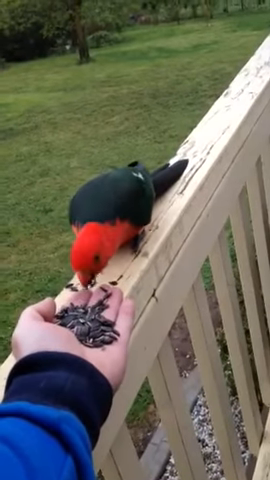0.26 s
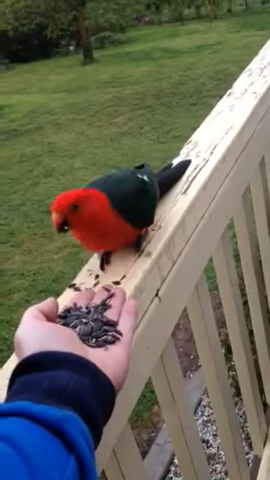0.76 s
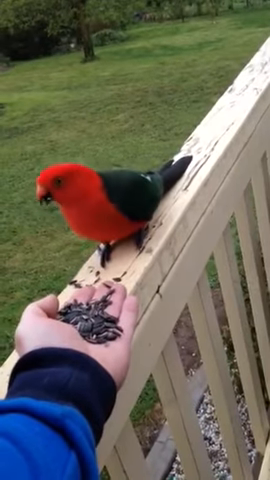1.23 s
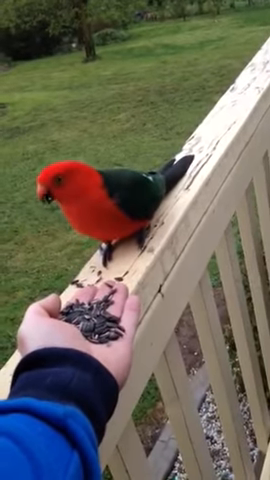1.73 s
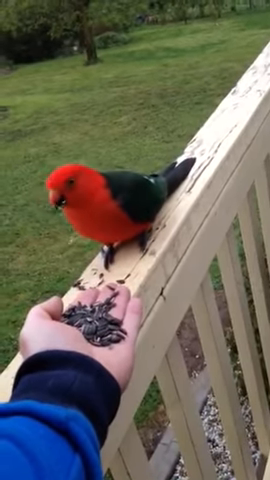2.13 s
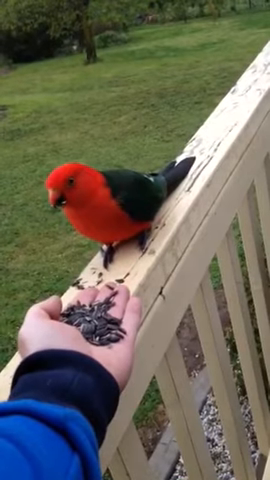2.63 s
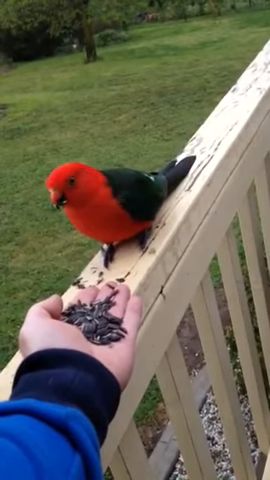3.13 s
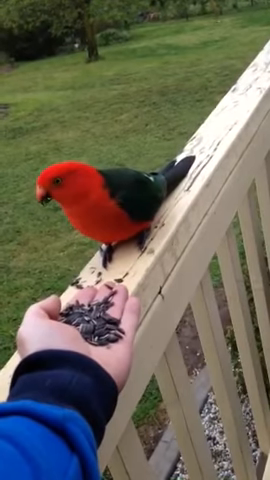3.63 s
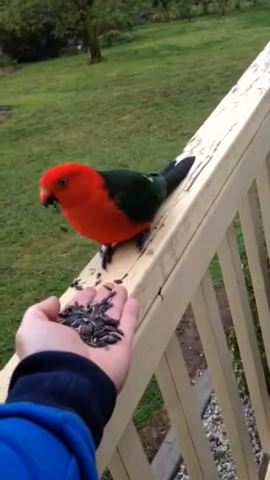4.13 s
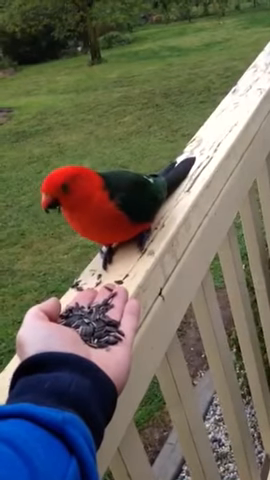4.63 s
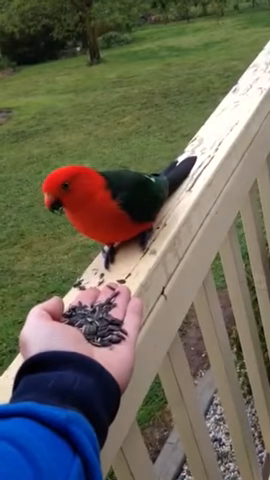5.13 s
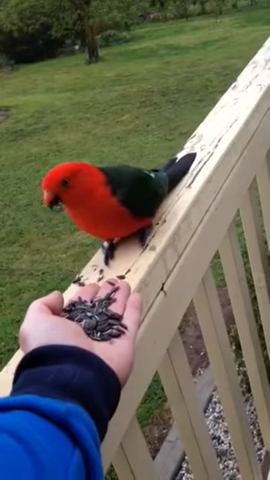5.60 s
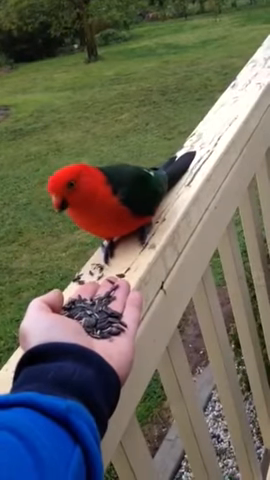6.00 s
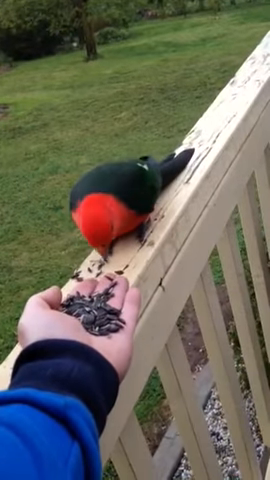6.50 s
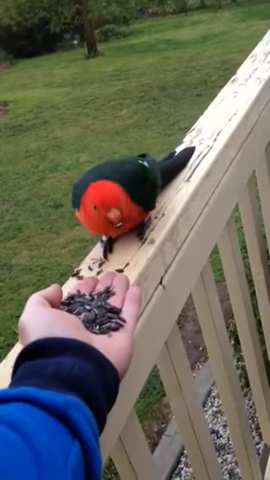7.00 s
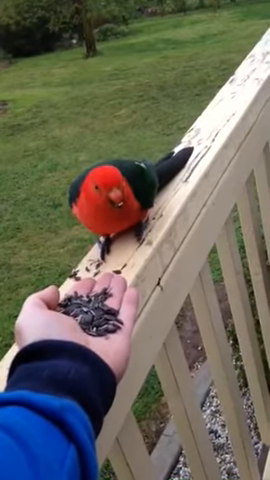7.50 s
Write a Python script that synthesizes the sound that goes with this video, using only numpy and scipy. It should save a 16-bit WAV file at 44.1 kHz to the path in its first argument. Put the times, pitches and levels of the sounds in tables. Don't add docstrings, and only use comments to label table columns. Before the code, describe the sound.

A parrot cracks and husks seeds close by with crisp clicks, wet smacks and nibbles, while garden birds peep and whistle over quiet outdoor air.

```python
import sys
import numpy as np
from scipy import signal
from scipy.fft import rfft, irfft
from scipy.io import wavfile

SR = 44100
rng = np.random.default_rng(int(sys.argv[2]) if len(sys.argv) > 2 else 0)


def gain_from_db(level_db):
    decades = np.asarray(level_db, float) / 20
    return 10 ** decades


def store_pcm(level_fs):
    pcm = np.round(np.clip(level_fs, -1, 1) * 32767).astype(np.int16)
    wavfile.write(sys.argv[1], SR, np.atleast_2d(pcm).T)


N = 341775

# start in seconds, level in dB, level of the rasp above it in dB.
FALLING_CALLS = [(0.313, -71.5, -71), (1.293, -72.5, -67.5), (1.575, -72, -66), (2.478, -71, -68.5),
                 (3.24, -72.5, -67), (4.119, -81, -62), (4.764, -69.5, -59), (5.014, -68, -62),
                 (5.876, -74.5, -70.5), (6.744, -70, -58.5), (6.983, -74.5, -65)]


def resonate(x, hz, width):
    r = np.exp(-np.pi * width / SR)
    feedback = [1, -2 * r * np.cos(2 * np.pi * hz / SR), r * r]
    return signal.lfilter(np.array([1, 0, -1]) * (1 - r * r) / 2, feedback, x + 1e-18)


def body(x, modes):
    return sum((-1) ** k * gain_from_db(db) * resonate(x, hz, width) for k, (hz, width, db) in enumerate(modes))


def rms_one(x):
    return x / np.sqrt(np.mean(x ** 2) + 1e-20)


def drift(rate, count=N):
    r = np.exp(-2 * np.pi * rate / SR)
    settle = 9000
    noise = rng.standard_normal(count + settle)
    return rms_one(signal.lfilter([1], [1, -2 * r, r * r], noise)[settle:])


def band(low_hz, high_hz):
    edges = signal.butter(2, [low_hz, high_hz], "band", fs=SR, output="sos")
    return rms_one(signal.sosfilt(edges, rng.standard_normal(N)))


def span(s, length):
    return np.arange(round(s * SR), min(round((s + length) * SR), N))


def in_time(rows):
    s, *columns = np.transpose(rows)
    at = np.arange(round(s[0] * SR), min(round(s[-1] * SR), N))
    return at, [np.interp(at / SR, s, column) for column in columns]


def swells(table, flat=.6):
    out = np.zeros(N)
    for s, length, db in table:
        at = span(s, length)
        out[at] += gain_from_db(db) * np.abs(np.sin(np.linspace(0, np.pi, len(at)))) ** flat
    return out


def echoes(x, t60, wet_db):
    t = np.arange(SR // 2) / SR
    tail = rng.standard_normal(len(t)) * gain_from_db(-60 * t / t60) * (t > .0012)
    tail /= np.sqrt(np.sum(tail ** 2))
    return x + gain_from_db(wet_db) * signal.fftconvolve(x, tail)[:N]


def notes(table, partials_db, rough, flat, turn=.5):
    out = np.zeros(N)
    for s, length, start_hz, middle_hz, end_hz, db in table:
        at = span(s, length)
        x = np.linspace(0, 1, len(at))
        bent = x ** (np.log(.5) / np.log(turn))
        hz = np.polyval(np.polyfit([0, .5, 1], [start_hz, middle_hz, end_hz], 2), bent)
        phase = 2 * np.pi * np.cumsum(hz * (1 + rough * drift(170, count=len(at)))) / SR
        waver_db = 60 * rough * drift(43, count=len(at))
        swell = np.abs(np.sin(np.pi * bent ** 0.91)) ** flat * gain_from_db(db + 10.0 + waver_db)
        out[at] += swell * sum(gain_from_db(p) * np.sin((k + 1) * phase) for k, p in enumerate(partials_db))
    return out


def garden():
    # frequency in Hz, density in dB per Hz.
    air_colour = [(18, -60.5), (30, -1.5), (98, -1), (245, -13), (540, -19), (780, -16), (1500, -19),
                  (1720, -20), (2170, -23.5), (7470, -48.5), (14400, -41), (16000, -61)]
    # time in seconds, level in dB.
    leaf_levels = [(0.0, -65.5), (1.21, -70), (1.96, -65), (3.43, -65), (4.94, -60.5), (5.72, -62.5),
                   (6.52, -66), (6.97, -62), (7.75, -64)]
    hz, db = np.transpose(air_colour)
    grid = np.fft.rfftfreq(N, 1 / SR) + 1
    colour = gain_from_db(np.interp(np.log(grid), np.log(hz), db))
    air = rms_one(irfft(rfft(rng.standard_normal(N)) * colour, N))
    _, (leaf_db,) = in_time(leaf_levels)
    leaves = sum(gain_from_db(leaf_db - 12.5 + 2.2 * drift(9)) * band(low_hz, low_hz * 1.425)
                 for low_hz in (2345, 3200, 4500, 6200))
    drone = rms_one(resonate(resonate(rng.standard_normal(N), 1700, 150), 1700, 150))
    return gain_from_db(-61.0) * air + leaves + gain_from_db(-72.0) * drone


def mains_hum():
    # frequency in Hz, level in dB.
    harmonics = [(50, -66), (100, -61.5), (150, -71)]
    t = np.arange(N) / SR
    return sum(gain_from_db(db + 1.0 + 0.44 * drift(2.2)) * np.sin(2 * np.pi * hz * t) for hz, db in harmonics)


def far_car():
    # time in seconds, crank rate in Hz, level in dB.
    drive = [
        (0.0, 28, -81),
        (1.5, 32.17, -69.5),
        (3.0, 37.78, -61.5),
        (3.7, 40.35, -74.5),
        (5.7, 39.86, -72.5),
        (6.6, 40, -80),
    ]
    # multiple of the crank rate, level in dB.
    orders = [(2, 5), (3, 4.5), (4, -12)]
    out = np.zeros(N)
    at, (crank_hz, db) = in_time(drive)
    turns = np.cumsum(crank_hz) / SR
    out[at] += sum(gain_from_db(db + rel_db) * np.sin(2 * np.pi * k * turns) for k, rel_db in orders)
    return out


def dove():
    # start in seconds, length in seconds, level in dB.
    coos = [(1.24, 0.046, -65.5), (1.55, 0.36, -65.5), (2.08, 0.42, -66.5), (2.6, 0.29, -65.5),
            (3.16, 0.25, -60.5), (3.43, 0.15, -63), (5.88, 0.32, -68)]
    coo = rms_one(resonate(resonate(rng.standard_normal(N), 776, 70), 776, 70))
    return swells(coos) * coo


def deck_thuds():
    # start in seconds, length in seconds, level in dB.
    thuds = [(0.01, 0.14, -54.5), (.52, 0.083, -64.5), (1.22, 0.16, -57), (1.7, 0.14, -61),
             (2.4, 0.2, -61.5), (3.16, 0.25, -55), (4.62, 0.089, -60.5), (5.24, 0.13, -54),
             (5.68, 0.27, -61.5), (6.85, 0.17, -74)]
    boom = rms_one(resonate(resonate(rng.standard_normal(N), 181.0, 29.4), 157.5, 42))
    return swells(thuds) * (boom + 0.4 * band(162, 390))


def falls():
    # seconds after the start, pitch in Hz, relative level in dB.
    shape = [
        (0, 3550, -10),
        (.02, 3650, -2.5),
        (.05, 3900, 4),
        (.085, 3200, -2),
        (.125, 2450, -9),
    ]
    out = np.zeros(N)
    for s, db, _ in FALLING_CALLS:
        at, (hz, shape_db) = in_time([(s + after_s, hz, rel_db) for after_s, hz, rel_db in shape])
        blur = 1 + .05 * drift(230, count=len(at))
        phase = 2 * np.pi * np.cumsum(hz * blur) / SR
        out[at] += gain_from_db(db + 11 + shape_db + 2.7 * drift(60.9, count=len(at))) * np.sin(phase)
    return out


def rasps():
    # start in seconds, length in seconds, level in dB.
    scolds = [(4.429, 0.078, -54.5), (5.24, .2, -64), (5.42, .28, -66), (6.415, 0.11, -67),
              (6.869, 0.034, -62.5), (6.932, 0.025, -67)]
    above_calls = [(s - .02, .1, rasp_db) for s, db, rasp_db in FALLING_CALLS]
    return swells(above_calls + scolds, flat=1.5) * band(3300, 5460) * gain_from_db(2 * drift(60))


def far_birds():
    # start in seconds, length in seconds, start pitch in Hz, end pitch in Hz, level in dB.
    chirps = [(1.107, 0.1, 5820, 3700, -71.5), (1.201, 0.054, 4900, 3900, -73),
              (1.912, 0.072, 4900, 4600, -67), (1.958, 0.076, 3800, 3630, -64),
              (2.085, 0.145, 3850, 3750, -68.5), (2.16, 0.07, 3300, 3000, -72.5),
              (2.27, 0.082, 3950, 3780, -73), (2.31, 0.13, 3300, 3050, -74.5),
              (2.855, 0.06, 3450, 3900, -79), (3.094, 0.055, 5300, 3900, -65.5),
              (3.128, 0.091, 3200, 2840, -75), (0.76, 0.084, 3300, 3090, -79.5),
              (4.44, 0.022, 4000, 3850, -65), (0.135, 0.009, 5800, 5600, -56),
              (0.157, 0.012, 5800, 5630, -63.5), (7.235, .07, 4600, 3400, -82),
              (1.865, .04, 5400, 5300, -74), (2.12, .07, 4350, 4500, -72), (1.925, .04, 4100, 3900, -72),
              (2.1, 0.043, 3300, 3050, -68), (7.664, 0.042, 4870, 3900, -65),
              (5.68, 0.23, 6950, 6800, -80.5), (5.95, 0.21, 6350, 6500, -82), (3.39, 0.22, 7100, 8500, -85)]
    early_fall = .62
    drops = [(s, length, hz, hz + early_fall * (end_hz - hz), end_hz, db)
             for s, length, hz, end_hz, db in chirps]
    far = falls() + rasps() + notes(drops, [0], rough=.065, flat=.8)
    return echoes(far, t60=.33, wet_db=-4)


def peeps():
    # start in seconds, length in seconds, top of the first partial in Hz,
    # end pitch as a share of the top, level in dB.
    peep_rows = [(2.99, 0.035, 2050, 0.97, -71), (3.525, 0.035, 2170, 0.9, -66),
                 (3.69, 0.039, 1830, 0.76, -56.5), (3.929, 0.065, 2090, 0.9, -65),
                 (4.109, 0.051, 1760, .87, -59.5), (4.213, 0.05, 2050, .89, -66),
                 (4.288, 0.035, 1930, 0.85, -69)]
    partials_db = [-22, -19, -5.5, -15, -26, -29, -40]
    climb_hz_per_s = 8200
    arches = [(s, length, hz - climb_hz_per_s * length, hz, end * hz, db)
              for s, length, hz, end, db in peep_rows]
    return echoes(notes(arches, partials_db, rough=.006, flat=.9), t60=.3, wet_db=-13)


def whistles():
    # start in seconds, length in seconds, pitch in Hz, glide in Hz, level in dB.
    whistle_rows = [(3.806, 0.022, 4440, -80, -65), (4.43, .018, 4900, -130, -57.5),
                    (4.442, .02, 4980, -52, -60), (4.445, .025, 4400, -51, -62),
                    (3.856, 0.028, 5860, -300, -64), (4.731, 0.13, 6020, 3, -67),
                    (4.368, 0.048, 5930, 128, -53.5), (4.56, 0.051, 6050, 203, -62),
                    (4.589, 0.053, 6160, -63, -47), (4.68, 0.049, 6065, -250, -53),
                    (4.85, 0.13, 5124, 39, -51.5), (4.96, 0.12, 5140, -57, -62),
                    (5.09, 0.097, 5100, -100, -54), (5.211, 0.07, 5130, -33, -62),
                    (6.118, .13, 3350, 454, -80.5), (6.576, 0.14, 3455, -73, -77.5),
                    (6.3, 0.078, 3400, 50, -75), (7.29, .1, 3450, -40, -82), (3.54, 0.05, 4900, -100, -77),
                    (7.55, 0.18, 2100, 277, -81), (7.685, 0.073, 3410, 7, -72),
                    (5.227, 0.087, 6370, 54, -75), (5.45, .09, 6250, 148, -72),
                    (6.31, 0.067, 3060, -650, -79), (6.054, .06, 3700, -51, -83)]
    glides = [(s, length, hz, hz + glide_hz / 2, hz + glide_hz, db)
              for s, length, hz, glide_hz, db in whistle_rows]
    return echoes(notes(glides, [0], rough=.004, flat=1.5), t60=.42, wet_db=-6.5)


def hollow_pops():
    # time in seconds, peak in dB.
    pops = [
        (1.206, -47),
        (3.7403, -25.5),
    ]
    tap = np.zeros(N)
    for s, db in pops:
        tap[round(s * SR)] = -gain_from_db(db) * 25
    return body(tap, [(604, 480, 5.1), (995, 190, 4.9)])


def crackle():
    # start in seconds, length in seconds, level in dB.
    rustles = [(.04, 0.067, -73), (.12, 0.084, -70), (.545, 0.033, -65), (.585, 0.089, -71),
               (.725, .05, -72), (.83, .1, -74), (.95, 0.06, -72), (1.04, 0.23, -75), (1.395, 0.031, -73),
               (1.5, .07, -64), (1.58, .2, -78), (1.81, .14, -76), (2.0, 0.43, -86), (2.88, .2, -75),
               (3.2, 0.041, -67), (3.33, 0.28, -74), (4.75, .1, -73), (5.3, .1, -72), (5.43, .1, -72),
               (5.56, .16, -69.5), (6.77, 0.063, -69), (6.835, 0.02, -59), (6.87, 0.19, -74),
               (7.08, 0.21, -69), (7.28, .47, -74)]
    grain_hz, tilt_db = (6900, 14000), -19
    sizes = gain_from_db(3.5 * np.minimum(rng.exponential(1, N), 3.5)) * rng.choice([-1, 1], N)
    born = rng.random(N) < 5000 * gain_from_db(5 * drift(40)) / SR
    dealt = rng.integers(0, 6, N)
    grains = sum(gain_from_db(tilt_db * k / 5) * resonate(sizes * born * (dealt == k), hz, 0.26 * hz)
                 for k, hz in enumerate(np.geomspace(*grain_hz, num=6)))
    return (gain_from_db(-83.0) + swells(rustles, flat=0.54)) * rms_one(grains)


def seal(s, length, first_hz, flutter_db, hiss_db):
    slack_hz, slowing = 487.5, 1.2
    full_at, fade_at, tail = .45, .7, 1.9
    share = np.array([0, full_at / 2, full_at, fade_at, (fade_at + 1) / 2, 1, tail])
    marks = [0, full_at, fade_at, 1, tail]
    slowed = np.cos(np.pi / 2 * np.minimum(share, 1)) ** (2 * slowing)
    hz = slack_hz + (first_hz - slack_hz) * slowed
    uneven = np.interp(share, [full_at / 2, fade_at], (.09, .4))
    flutter = flutter_db + np.interp(share, marks, (-8, 2, 0, -14, -62))
    hiss = hiss_db + np.interp(share, marks, (-6, -1.5, -6, -24, -43))
    return np.c_[s + length * share, hz, flutter, hiss, uneven]


def smacks():
    # start in seconds, length in seconds, first flutter in Hz, flutter level in dB, hiss level in dB.
    smack_rows = [
        (3.726, 0.02, 2008, -29, -32.5),
        (3.969, 0.041, 1900, -25, -26),
        (4.233, .048, 1800, -24, -23.5),
        (4.427, 0.085, 799, -53, -75),
    ]
    # frequency in Hz, width in Hz, level in dB.
    cavity = [(424, 293, 3), (646, 336, 3), (1210, 300, 1), (1800, 760, -3), (3400, 620, -83)]
    # frequency in Hz, width in Hz, level in dB.
    port = [(4890, 4600, -5.5), (7480, 820, 2.5), (9950, 2700, -8), (15300, 1900, -9)]
    out = np.zeros(N)
    for row in smack_rows:
        at, (hz, flutter_db, hiss_db, uneven) = in_time(seal(*row))
        turns = np.cumsum(hz * np.exp(uneven * drift(500, count=len(at)))) / SR
        strength = gain_from_db(8.6 * uneven * rng.standard_normal(len(at)))
        pulses = np.diff(np.floor(turns), prepend=0) * strength * SR / hz / 8
        gate = 0.36 + np.exp(-5 * (turns % 1))
        hiss = rms_one(body(gate * rng.standard_normal(len(at)) - 1.4 * pulses, port))
        out[at] -= gain_from_db(flutter_db + 8.5) * body(pulses, cavity) - gain_from_db(hiss_db) * hiss
    return echoes(out, t60=0.11, wet_db=-11.0)


def cracks():
    # time in seconds, peak in dB, ring in Hz,
    # kernel knock in relative dB, husk snap in relative dB.
    splits = [(0.755, -35.5, 6200, -30, -8), (1.735, -28.5, 7600, -29, -12), (1.8324, -32, 8260, -22, 3),
              (3.0808, -13.5, 7620, -20.5, -26), (3.0834, -22.5, 7660, -11.5, 1.5),
              (3.0983, -26, 7100, -11.5, -14), (3.203, -27.5, 7600, -19, -19),
              (3.213, -28.5, 7100, -20, -11), (4.8746, -27, 7320, -24, -19), (4.883, -7.5, 7490, -18, -3),
              (4.888, -22, 7550, -16, 0), (5.2958, -26.5, 7460, -20, 3.5), (5.3019, -30.5, 8260, -8, 10.5),
              (5.566, -28, 7800, -19.5, -1), (7.1227, -30.5, 7600, -1.5, -2),
              (7.1272, -27.5, 7460, -13, -7), (7.193, -20.5, 7460, -15, -5), (7.3933, -17, 6660, -9.5, -5),
              (7.402, -22, 7250, -15.5, -4), (7.5318, -24.5, 6600, -10, -4), (7.5372, -29, 7280, -6.5, 0),
              (7.651, -25, 7540, -36, -4), (7.6805, -14.5, 7250, -37, -22), (7.7137, -33, 6860, -32, -2)]
    # time in seconds, peak in dB, husk snap in
    # relative dB.
    more_crack_rows = [(0.047, -53, 2), (0.054, -52, -4), (0.7498, -45, 1), (0.8808, -39.5, -9),
                       (1.5075, -34, -0.5), (1.5253, -32.5, -13), (1.5378, -36.5, 2), (1.5527, -40, -2),
                       (1.6455, -38, -14), (1.9945, -33, -14), (2.9174, -39, -7), (3.0751, -34, -18),
                       (3.086, -40, 0), (3.0898, -37, -13), (3.5196, -38, -8), (3.7404, -26.5, 5),
                       (3.7483, -31, 5), (4.896, -44, 1), (5.025, -31, 0), (5.6674, -38, -7),
                       (5.6866, -34.5, -12), (6.0388, -34.5, -13), (6.836, -34.5, -8), (6.8425, -43, -12),
                       (7.1337, -27.5, -15), (7.197, -38, -7), (7.2126, -29.5, 1), (7.3992, -42, 5),
                       (7.658, -30, -18), (7.6865, -32, -13)]
    # time in seconds, peak in dB,
    # fibre tick in relative dB.
    nibble_rows = [(0.0674, -58, -9), (0.2239, -61, -9), (0.3694, -72, -9), (0.5274, -64, -9),
                   (0.5337, -56, -9), (0.5514, -55, -9), (0.5554, -56, -9), (0.558, -51, -9),
                   (0.5886, -55, -9), (0.6034, -63, -9), (0.6135, -54, -9), (0.6494, -58, -9),
                   (0.7684, -54, -9), (0.7844, -64, -9), (0.838, -55, -9), (0.9048, -47, -9),
                   (0.9134, -52, -9), (0.981, -51, -9), (1.0475, -57, -9), (1.0534, -62, -9),
                   (1.0834, -54, -9), (1.1099, -52, -11), (1.1827, -48, -9), (1.2072, -47, -9),
                   (1.2311, -56, -9), (1.2544, -61, -9), (1.3219, -61, -9), (1.4062, -59, -9),
                   (1.4134, -59, -9), (1.4464, -64, -9), (1.5888, -42, -7), (1.6004, -54, -9),
                   (1.6142, -40, -7), (1.6604, -62, -12), (1.7998, -44, -7), (1.863, -45, -11),
                   (1.9096, -54, -9), (2.0077, -42, -9), (2.0328, -52, -7), (2.0374, -52, -7),
                   (2.0572, -56, -9), (2.145, -53, -9), (2.385, -53, -9), (2.6384, -47, -6),
                   (2.646, -43.5, -4), (2.714, -54, -5), (2.8878, -56, -9), (2.9214, -44, -9),
                   (2.9457, -44, -9), (2.9692, -54, -9),
                   (2.9844, -61, -11), (2.9986, -49, -11), (3.022, -45, -11), (3.0255, -40.5, -8),
                    (3.0364, -47, -11), (3.2644, -65, -11), (3.3428, -47, -6), (3.3717, -50, -9),
                    (3.3807, -48, -9), (3.3878, -44, -8), (3.4421, -54, -11), (3.5584, -51, -11),
                    (4.4306, -38, -9), (4.7795, -49, -11), (4.8314, -47, -11), (4.8369, -44, -11),
                    (4.9876, -53, -9), (5.3545, -40.5, -11), (5.3822, -52, -11), (5.3934, -58, -11),
                    (5.4574, -57, -11), (5.472, -49, -11), (5.539, -45, -11), (5.5972, -43, -13),
                    (5.7039, -45, -11), (5.7454, -56, -11), (5.8092, -53, -11), (5.909, -50, -11),
                    (6.788, -53, -11), (6.7989, -43, -11), (6.9044, -58, -11), (6.9174, -59, -11),
                    (6.9706, -50, -11), (6.989, -58, -11), (7.1624, -48, -11), (7.2184, -45, -11),
                    (7.2534, -48, -11), (7.3397, -50, -11), (7.503, -44, -11), (7.5762, -52, -11),
                    (7.6071, -42, -14),
                   (.875, -52, -6), (1.491, -56, -14), (1.7177, -49, -6), (1.84, -45, -6), (1.982, -58, 8),
                (2.897, -56, 0), (3.507, -53, -6), (3.511, -52, -2), (5.651, -49, -12), (6.015, -49, -10),
                (6.021, -53, -10), (7.108, -49, -18), (7.188, -50, -18), (7.508, -50, -14),
                (.7275, -55, -2), (1.8225, -43, -8), (3.5255, -46, -8), (5.631, -53, -11),
                (7.1704, -52, -18), (7.1744, -53, -18), (7.178, -47, -18), (7.6288, -44, -12),
                (7.6637, -44, -12), (7.645, -50, -10), (7.672, -46, -12)]
    # time in seconds, fibre tick in relative dB, kernel knock in Hz.
    facing = [(0, -4, 3300), (1.5, -3, 2800), (1.74, -18, 2800), (1.85, -8, 2800), (3.08, -10, 2800),
              (4.87, -20, 2510), (5.3, -14, 2800), (5.67, -8, 3200), (6.8, -18, 3000), (7.13, -16, 2800),
              (7.2, -15, 3120), (7.4, -17, 3280), (7.54, -14, 3500), (7.75, -16, 3000)]
    part_widths = [1900, 3000, 1700, 1490, 3000, 1100]
    hull_hz, fibre_hz, thump_hz = 7550, 13800, 1300
    upper_knock = 1.6
    lag_s, lift_db = .0007, 2.5

    more_cracks = [(s, db, hull_hz, -18.5, snap_db) for s, db, snap_db in more_crack_rows]
    nibbles = [(s + lag_s, db + lift_db, hull_hz, -17, -3 + .6 * fibre_db, fibre_db)
               for s, db, fibre_db in nibble_rows]
    turn_s, turn_db, turn_hz = np.transpose(facing)
    faced = [(*row, np.interp(row[0], turn_s, turn_db)) for row in splits + more_cracks]
    chances = rng.normal(0, 1, (999, 5))
    out = np.zeros(N + 256)
    for (s, db, ring_hz, knock_db, snap_db, fibre_db), chance in zip(faced + nibbles, chances):
        click = np.eye(1, 256)[0] * gain_from_db(db) * SR / 1.53
        snap_hz = 10450 * np.exp(.084 * chance[3])
        knock_hz = np.interp(s, turn_s, turn_hz)
        parts = [(ring_hz, 0),
                 (snap_hz, snap_db - 0.5),
                 (knock_hz, knock_db + chance[0]),
                 (upper_knock * knock_hz, knock_db - 1.5 + 2 * chance[1]),
                 (fibre_hz, fibre_db),
                 (thump_hz, knock_db - 16 + 2 * chance[4])]
        for (hz, rel_db), width in zip(parts, part_widths):
            hz = hz * (1 + .015 * chance[2])
            ring = resonate(resonate(click, hz, width), hz, width * 0.52)
            out[round(s * SR):][:256] += gain_from_db(rel_db) / width * ring
    out = out[:N]
    rustle = echoes(out, t60=0.069, wet_db=-13) - out
    return out + resonate(rustle, 6800, 7900)


def scene():
    background = garden() + mains_hum() + far_car() + dove() + deck_thuds()
    birds = far_birds() + peeps() + whistles()
    foreground = hollow_pops() + crackle() + smacks() + cracks()
    return (background + birds + foreground)[None]


def top_cut(x):
    return signal.sosfilt(signal.butter(12, 16530, fs=SR, output="sos"), x)


def record(dry):
    x = signal.sosfilt(signal.butter(5, 43, "high", fs=SR, output="sos"), dry)
    x = signal.sosfilt(signal.cheby2(12, 24, 15450, fs=SR, output="sos"), x)
    return top_cut(x)


dry = scene()
out = record(dry)
store_pcm(out)
```